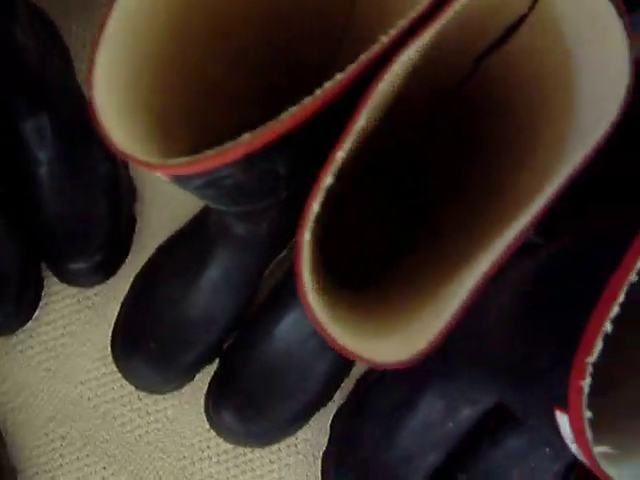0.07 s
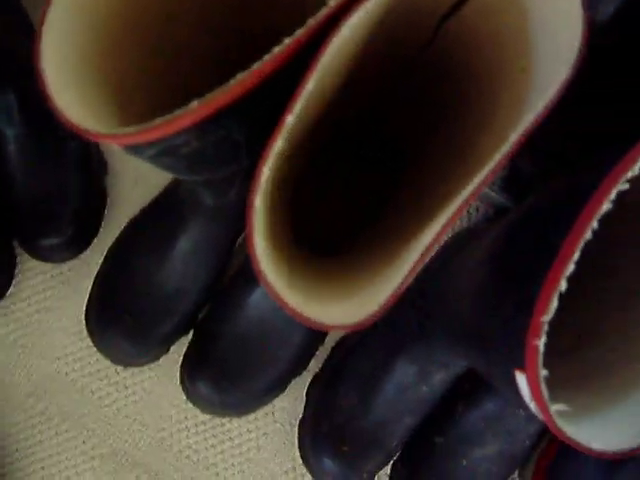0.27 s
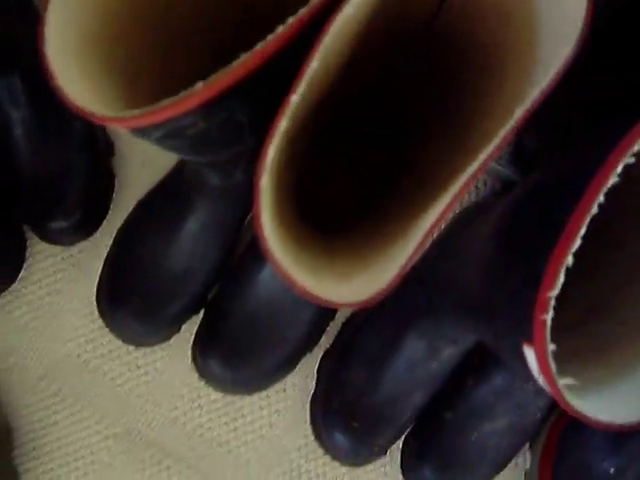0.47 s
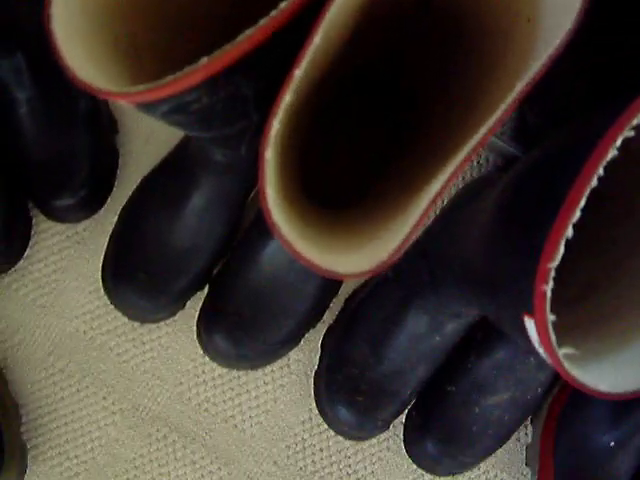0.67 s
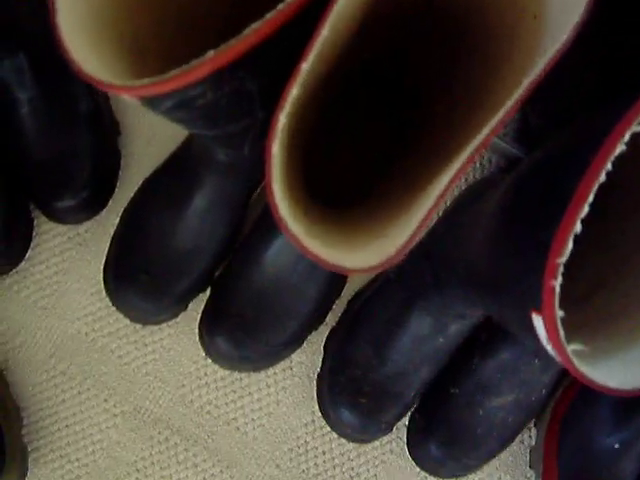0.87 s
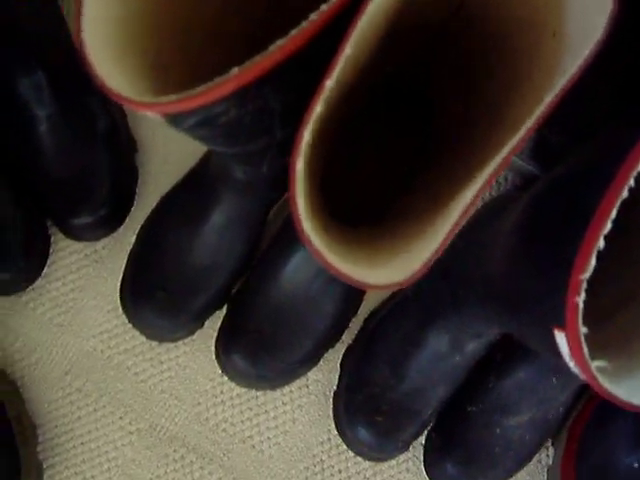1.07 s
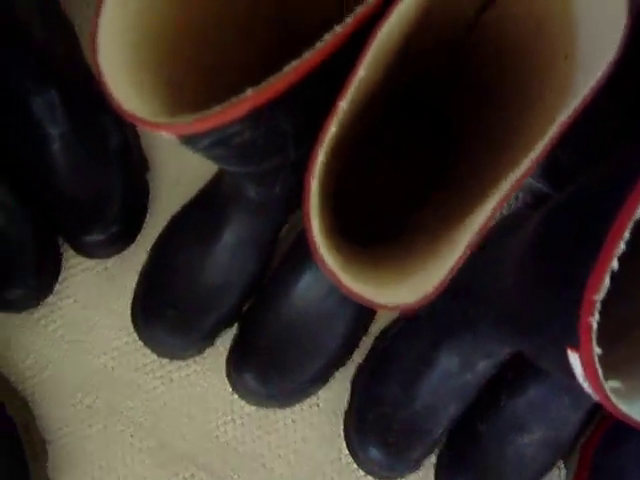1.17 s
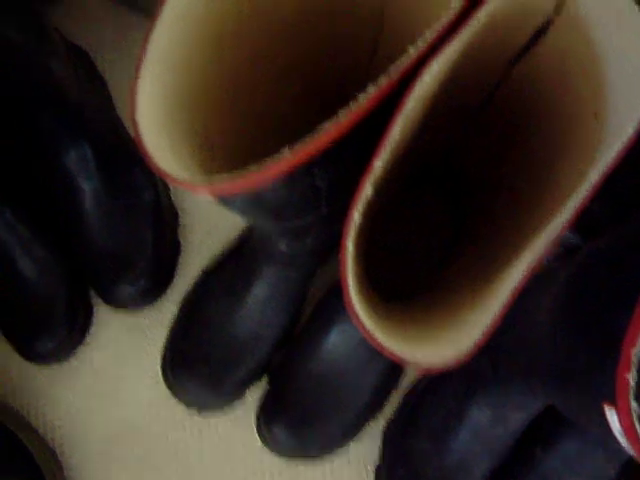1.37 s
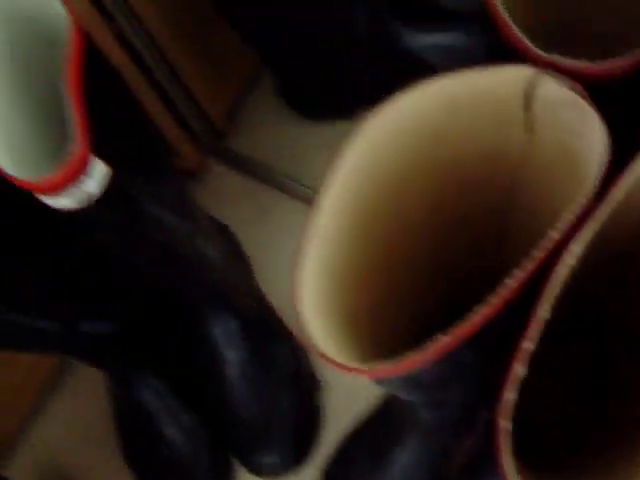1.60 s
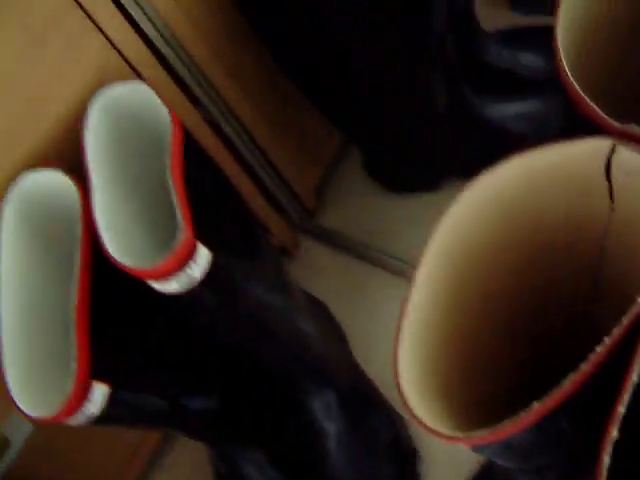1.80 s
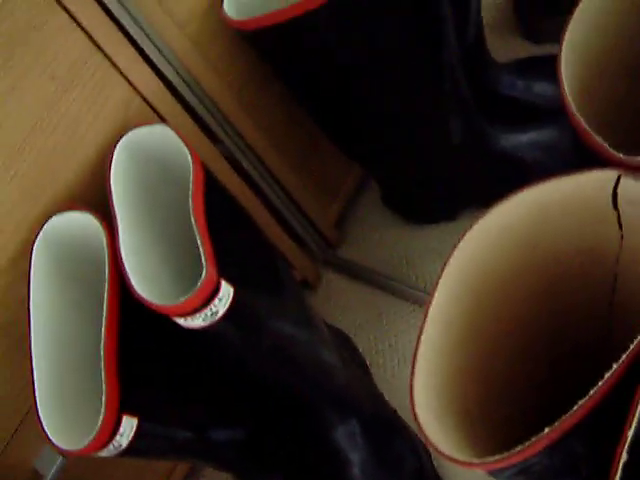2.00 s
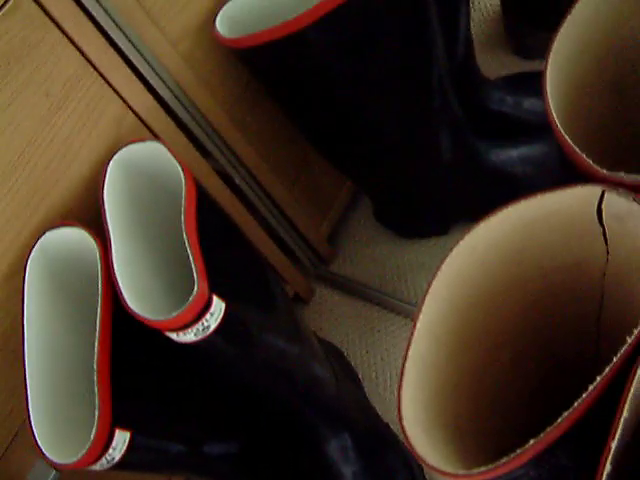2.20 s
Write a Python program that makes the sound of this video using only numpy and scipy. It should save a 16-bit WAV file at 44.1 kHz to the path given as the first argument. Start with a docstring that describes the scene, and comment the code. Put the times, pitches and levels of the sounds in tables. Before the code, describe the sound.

A loud knock rattles a hand-held camera's plastic case and briefly overloads its microphone. A few lighter finger taps, faint sleeve rustle and rubbing follow, over low hiss in a quiet hallway.

```python
"""Bumped hand-held camera in a hallway.

A blow rattles the plastic case, shoves and overloads the microphone, and leaves a short room tail.
Fingers tap and slide on the case; hand and sleeve rustle as the grip shifts.
Under it lie a quiet room with a faint whir and the hiss of a narrow-band recorder."""
import sys
import numpy as np
from scipy import signal
from scipy.fft import rfft, irfft
from scipy.io import wavfile
from scipy.ndimage import uniform_filter1d

SR = 44100
rng = np.random.default_rng(int(sys.argv[2]) if len(sys.argv) > 2 else 0)


def persist_wave(psi):
    """Save psi, clipped to +-1, as 16-bit WAV."""
    counts = np.round(np.clip(psi, -1, 1) * 32767).astype(np.int16)
    wavfile.write(sys.argv[1], SR, np.atleast_2d(counts).T)


N = 99225
TIME_S = np.arange(N) / SR

# Room and recorder hiss. Each row: frequency in Hz, relative level in dB.
HISS_SPECTRUM = [(35, -57), (60, -13), (188, -6), (367, -2.5), (393, -1), (477, -3.5), (559, -4), (808, -9),
                 (852, -3.5), (1250, -13.5), (1520, -11), (3600, -11), (4000, -12.5), (5200, -50),
                 (8800, -120)]
# Finger taps. Each row: start in seconds, level in dB, pitch in Hz, decay in seconds, low-pass in Hz.
FINGER_TAPS = [(.0005, -14, 291, 0.0017, 710), (0.5247, -15, 346, 0.002, 910),
               (.5452, -30.5, 480, .002, 1800), (0.5564, -35, 400, .003, 3000),
               (0.6704, -31, 326, .003, 700), (1.6517, -30.5, 695, .0015, 1200),
               (1.6916, -4.5, 520, 0.0013, 2270), (1.7308, -11.5, 870, 0.00092, 1490),
               (1.8678, -29.5, 476, .002, 3000)]
# Hand and sleeve. Each row: middle in seconds, half length in seconds, level in dB, centre in Hz,
# width in Hz.
GRIP_RUSTLES = [(0.018, 0.026, -44, 292, 80), (0.173, 0.024, -69, 500, 900), (0.562, 0.05, -46.5, 384, 250),
                (0.68, 0.019, -48, 345, 302), (0.984, 0.033, -51, 335, 200), (1.067, 0.03, -49.5, 445, 350),
                (1.138, 0.047, -48.5, 523, 197), (1.243, .06, -51.5, 890, 1390),
                (1.428, .07, -49, 695, 1800)]
# Case resonances. Each row: frequency in Hz, relative level in dB, T60 in seconds.
CASE_MODES = [(283.5, -12, .13), (324, -7.5, 0.17), (459.2, -5, 0.11), (590, -17.5, 0.12),
              (675, -22.5, .11), (714, -8.5, 0.124), (818.5, -5.5, .11), (923, -4, 0.058),
              (1100, -1.5, 0.065), (1430, -8.5, 0.059), (2614, -15, 0.046), (3620, -15.5, 0.076)]
# Shoves on the microphone. Each row: start in seconds, level in dB, pitch in Hz, decay in seconds.
MIC_SHOVES = [(0.203, -21.5, 59.6, 0.01), (0.2222, -11.5, 29.1, 0.01), (0.246, -26, 118, 0.014)]
# Contacts within the bump. Each row: start in seconds, thud level in dB, thud pitch in Hz,
# crack level in dB, crack decay in seconds.
BUMP_CONTACTS = [(0.205, -20, 298, -48, 0.0035), (0.2067, -44.5, 600, -19, 0.022),
                 (0.2206, -25.5, 454, -4.5, 0.0037), (0.2249, -1, 1208, -3.5, .004),
                 (.2290, 2, 680, -11, .005), (0.2326, -8.5, 409, -22, 0.0045),
                 (.2396, -0.5, 710, -11, 0.0056), (0.2508, -8, 602, -5.5, 0.0032),
                 (0.2534, -2.5, 490, -14, 0.0058), (0.2639, -2.5, 764, -14.5, 0.0032),
                 (.2694, -9.5, 560, -22, 0.0027), (.2750, -8.5, 584, -46, .003)]
# Crack of loose plastic. Each row: frequency in Hz, relative level in dB.
CRACK_SPECTRUM = [(100, -12), (300, 0.5), (700, -1.5), (1200, -2), (1600, -2), (2100, -1), (2700, 0),
                  (3300, -4.5), (3800, -4), (4400, -10)]
# Finger strokes. Each row: start in seconds, length in seconds, level in dB, swell over the stroke in dB.
FINGER_SLIDES = [(0.53, 0.041, -53.5, -2), (1.689, 0.1, -39, -6.5), (1.863, 0.015, -44.5, -9),
                 (1.888, 0.058, -48.5, -5), (1.955, 0.0833, -43.5, -2.5), (2.042, 0.036, -41, -3),
                 (2.0781, 0.0037, -33, 8)]
# Skin friction. Each row: frequency in Hz, relative level in dB.
SLIDE_SPECTRUM = [(100, -22), (300, 2), (600, 3.5), (1000, 0.5), (1600, 0.5), (2400, 0), (3300, -1.5),
                  (4000, -6)]


def undb(db):
    """Decibels to gain."""
    return 10 ** (np.asarray(db) / 20)


def unit_rms(x):
    """Scale to rms 1."""
    return x / np.sqrt(np.mean(x ** 2))


def shaped_noise(spectrum, top_hz=4550):
    """Noise of rms 1, coloured by (Hz, dB) points."""
    hz, db = np.array(spectrum).T
    bins_hz = np.maximum(np.fft.rfftfreq(N, 1 / SR), 1)
    gain = undb(np.interp(np.log(bins_hz), np.log(hz), db)) * (bins_hz < top_hz)
    return unit_rms(irfft(rfft(rng.standard_normal(N)) * gain, N))


def band_noise(hz, width_hz):
    """Noise of rms 1 in one resonance."""
    return unit_rms(signal.lfilter(*signal.iirpeak(hz, hz / width_hz, fs=SR), rng.standard_normal(N)))


def since(start_s):
    """Seconds since start, zero before."""
    return np.maximum(TIME_S - start_s, 0)


def burst(start_s, rise_s, decay_s):
    """Envelope: quick rise, exponential fall."""
    return (1 - np.exp(-since(start_s) / rise_s)) * np.exp(-since(start_s) / decay_s)


def swing(start_s, hz, decay_s, rise_s=0.00045):
    """Damped oscillation from rest."""
    return np.sin(2 * np.pi * hz * since(start_s)) * burst(start_s, rise_s, decay_s)


def background(hiss_db=-51, whir_db=-59.5):
    """Steady hiss with a faint whir."""
    return undb(hiss_db) * shaped_noise(HISS_SPECTRUM) + undb(whir_db) * band_noise(hz=1285, width_hz=84)


def taps(ring_db=-43):
    """A fingertip kicks the case and damps it at once; each tap has its own brightness."""
    out = np.zeros(N)
    for start_s, db, hz, decay_s, lowpass_hz in FINGER_TAPS:
        motion = np.sin(2 * np.pi * hz * since(start_s)) * np.exp(-since(start_s) / decay_s)
        velocity = np.gradient(motion) * SR / (2 * np.pi * hz)
        tap = signal.sosfilt(signal.butter(2, lowpass_hz, fs=SR, output="sos"), velocity)
        out += undb(db) * (tap + undb(ring_db) * case_ring(start_s))
    return out


def case_ring(start_s, length_s=0.4):
    """Decaying case modes; each contact excites them a little differently."""
    age_s = since(start_s)[:int((start_s + length_s) * SR)]
    shares = 1 + 0.34 * rng.standard_normal(len(CASE_MODES))
    ring = sum(share * undb(db - 60 * age_s / t60_s) * np.sin(2 * np.pi * hz * age_s)
               for share, (hz, db, t60_s) in zip(shares, CASE_MODES))
    return np.pad(ring, (0, N - len(ring)))


def rustles():
    """Hand and sleeve rub in faint swells as the grip shifts."""
    return sum(undb(db) * np.exp(-((TIME_S - middle_s) / half_s) ** 2) * band_noise(hz, width_hz)
               for middle_s, half_s, db, hz, width_hz in GRIP_RUSTLES)


def bump(thud_decay_cycles=1.15, ring_db=-20, crack_rise_s=0.00049):
    """Quick contacts, each a thud, a short ring and a crack of loose plastic, over low shoves."""
    out = sum(-undb(db) * swing(start_s, hz, decay_s) for start_s, db, hz, decay_s in MIC_SHOVES)
    for start_s, thud_db, hz, crack_db, crack_decay_s in BUMP_CONTACTS:
        thud = swing(start_s, hz, thud_decay_cycles / hz)
        out += undb(thud_db) * (thud + undb(ring_db) * case_ring(start_s))
        out += undb(crack_db) * shaped_noise(CRACK_SPECTRUM) * burst(start_s, crack_rise_s, crack_decay_s)
    return out


def hallway(x, t60_s=0.31, tail_db=-23, delay_s=0.0094):
    """Walls add a short, faint tail."""
    tail = rng.standard_normal(N) * burst(delay_s, rise_s=delay_s, decay_s=t60_s / np.log(1000))
    return x + undb(tail_db) * signal.fftconvolve(x, tail / np.linalg.norm(tail))[:N]


def slides(edge_s=0.0031, grain_db=2, grain_hz=397):
    """Skin sticks and slips on plastic: fine, uneven grain along each stroke."""
    envelope = np.zeros(N)
    for start_s, length_s, db, swell_db in FINGER_SLIDES:
        age_s = since(start_s)
        gate = np.clip(np.minimum(age_s, length_s + edge_s - age_s) / edge_s, 0, 1)
        progress = np.minimum(age_s / length_s, 1)
        envelope += gate * undb(db + swell_db * (progress - 0.5))
    grain = unit_rms(uniform_filter1d(rng.standard_normal(N), int(SR / grain_hz)))
    return envelope * unit_rms(shaped_noise(SLIDE_SPECTRUM) * undb(grain_db * grain))


def scene():
    """Mono mix. Only the bump excites the room; handling travels through the case."""
    return (hallway(bump()) + taps() + slides() + rustles() + background())[None]


def record(dry, band_hz=4150, dc_offset=0.021, clip_level=0.81, top_hz=15800):
    """Narrow-band recorder with a small offset; the loudest peaks clip, then a final low-pass."""
    narrow = signal.sosfiltfilt(signal.butter(16, band_hz, fs=SR, output="sos"), dry)
    clipped = np.clip(narrow + dc_offset, -clip_level, clip_level)
    return signal.sosfiltfilt(signal.ellip(8, 0.1, 70, top_hz, fs=SR, output="sos"), clipped)


dry = scene()
out = record(dry)
persist_wave(out)
```